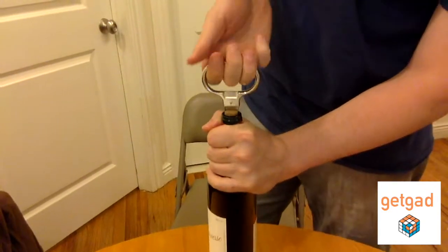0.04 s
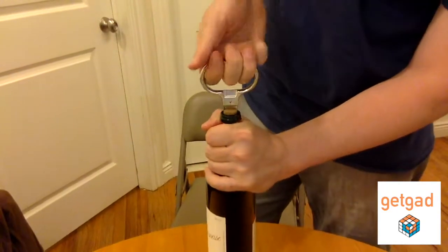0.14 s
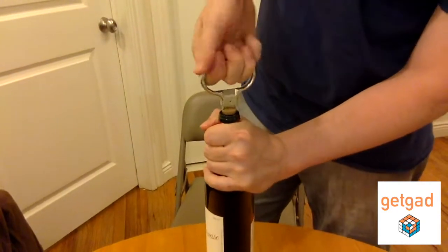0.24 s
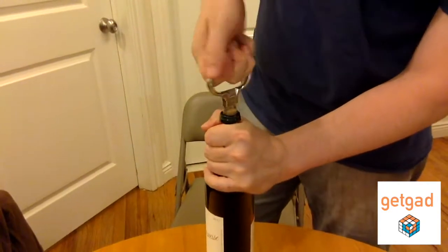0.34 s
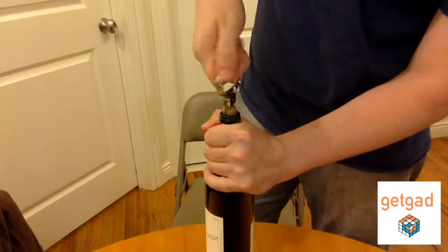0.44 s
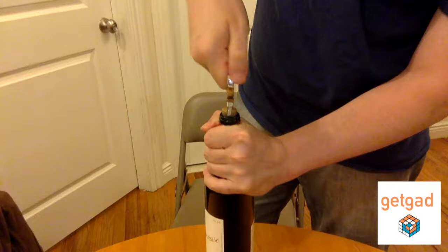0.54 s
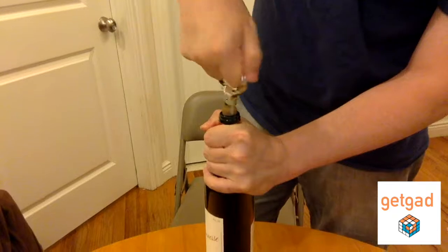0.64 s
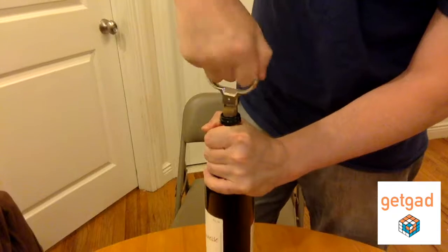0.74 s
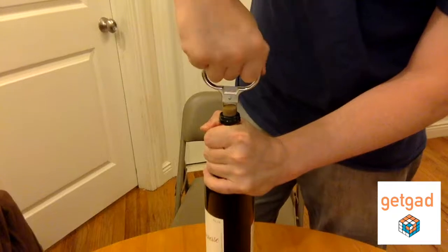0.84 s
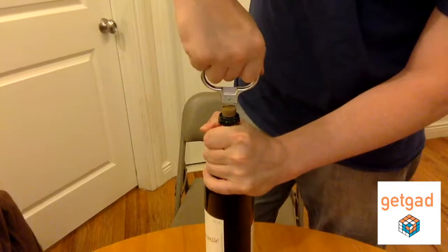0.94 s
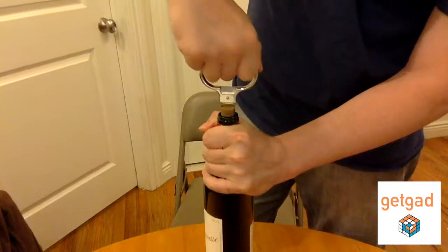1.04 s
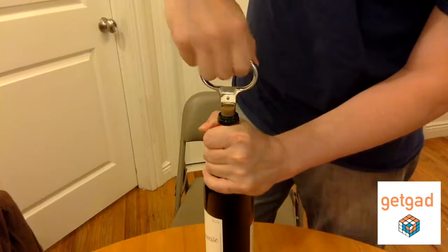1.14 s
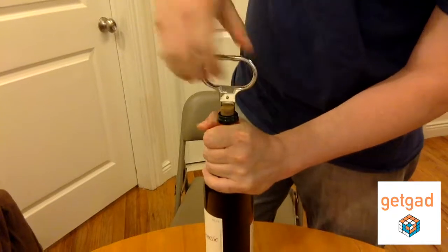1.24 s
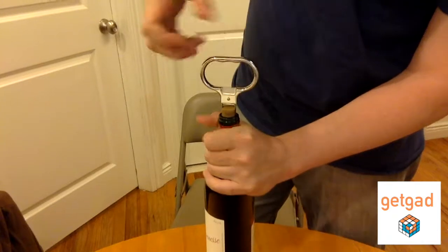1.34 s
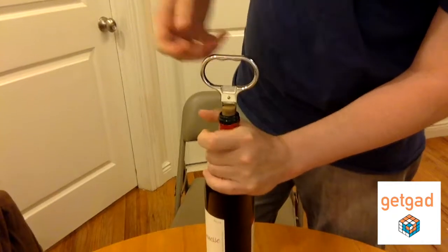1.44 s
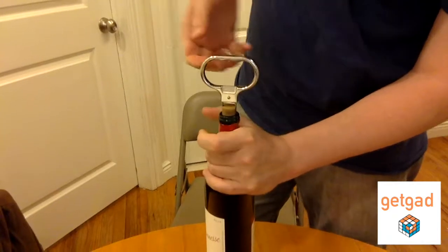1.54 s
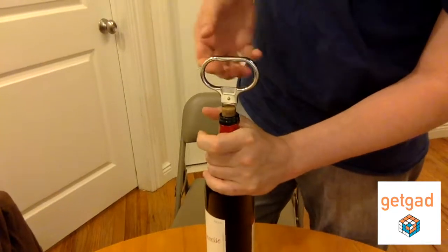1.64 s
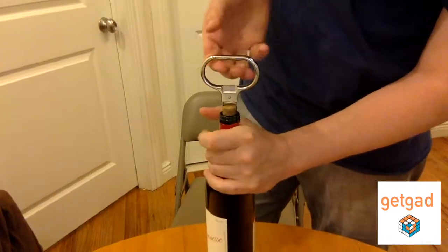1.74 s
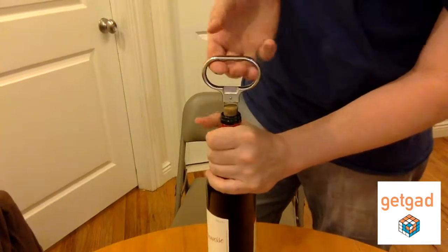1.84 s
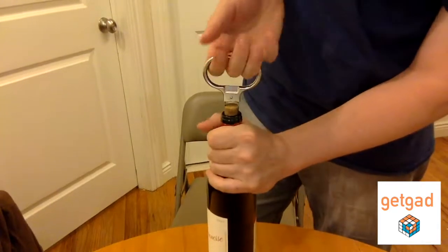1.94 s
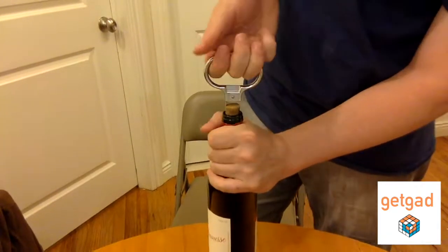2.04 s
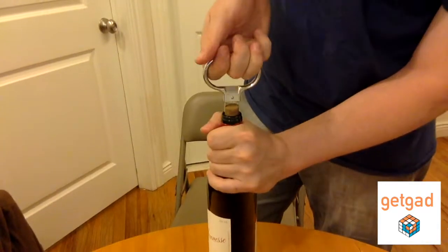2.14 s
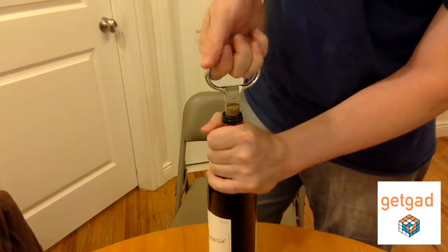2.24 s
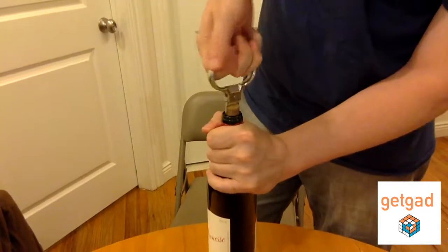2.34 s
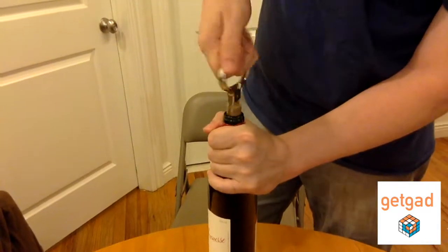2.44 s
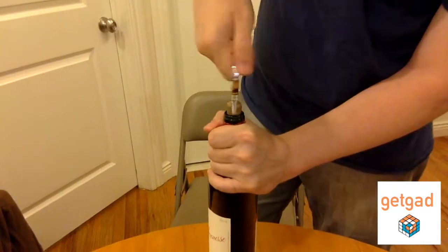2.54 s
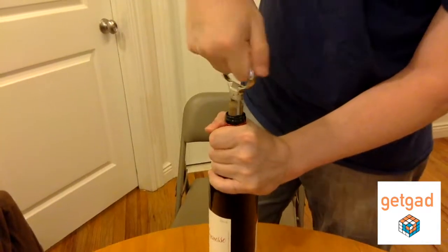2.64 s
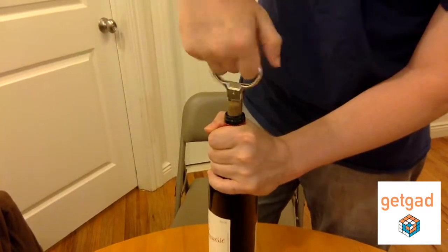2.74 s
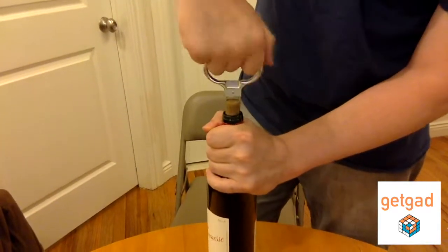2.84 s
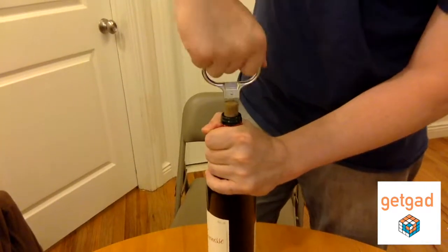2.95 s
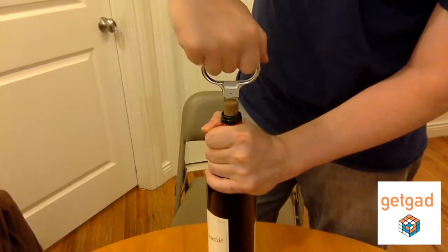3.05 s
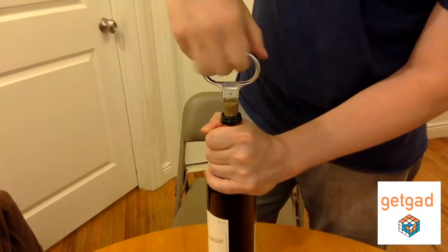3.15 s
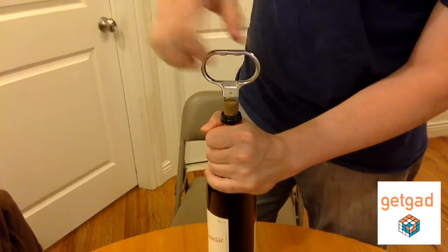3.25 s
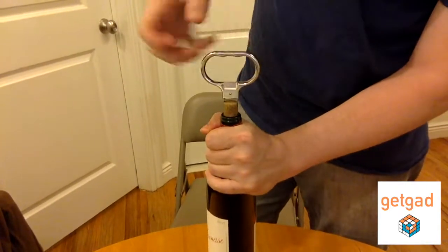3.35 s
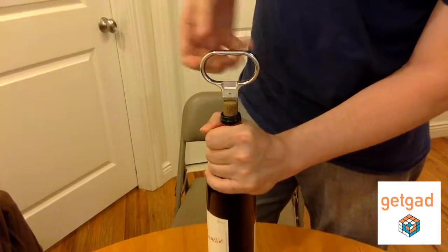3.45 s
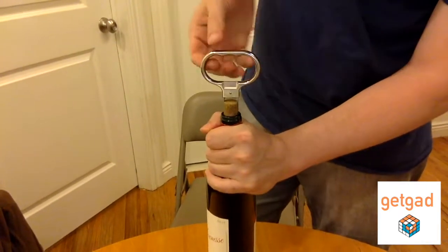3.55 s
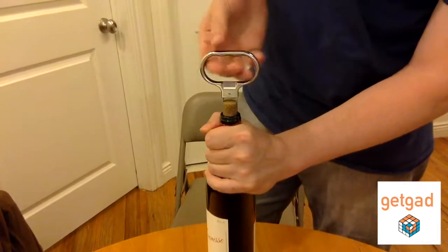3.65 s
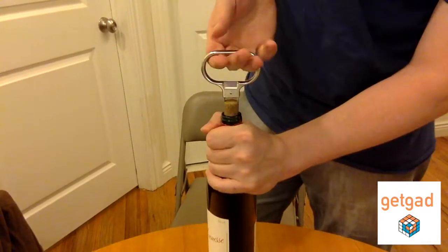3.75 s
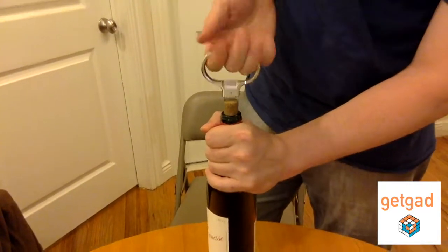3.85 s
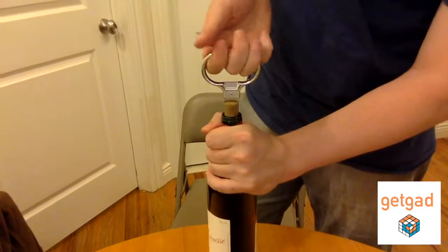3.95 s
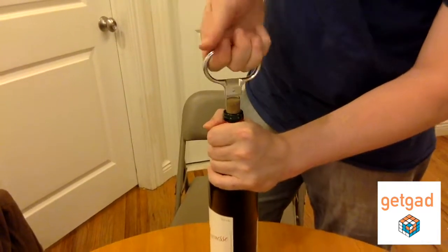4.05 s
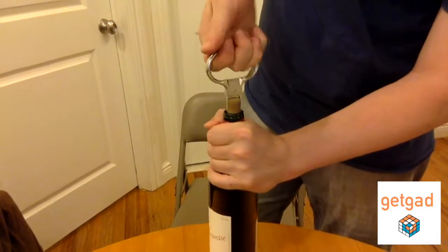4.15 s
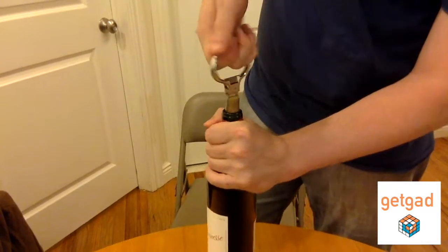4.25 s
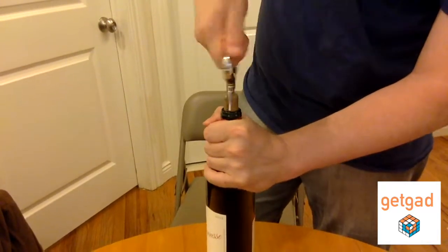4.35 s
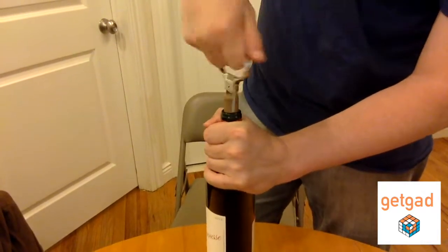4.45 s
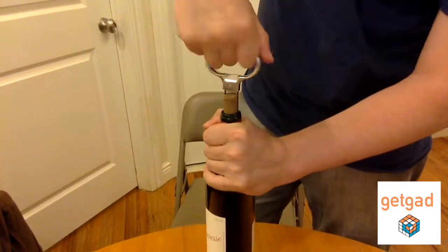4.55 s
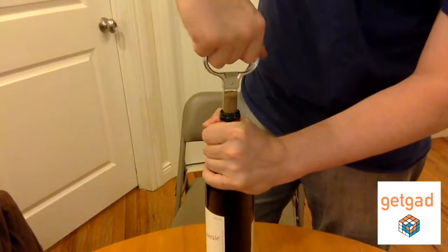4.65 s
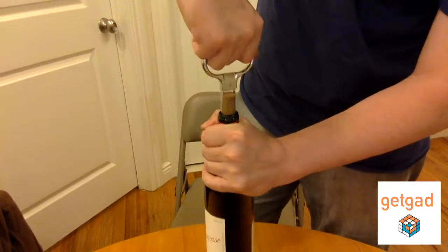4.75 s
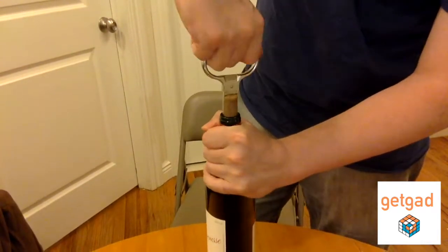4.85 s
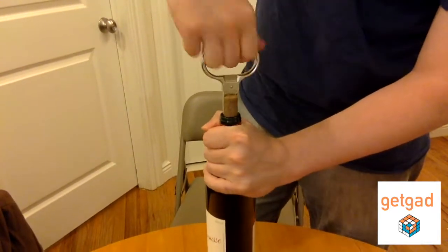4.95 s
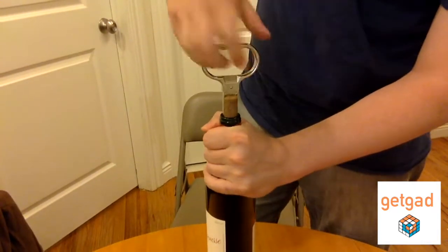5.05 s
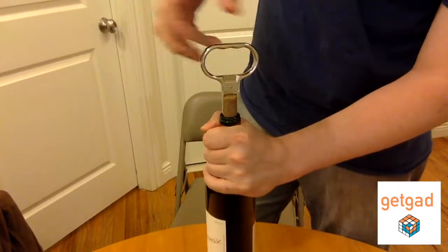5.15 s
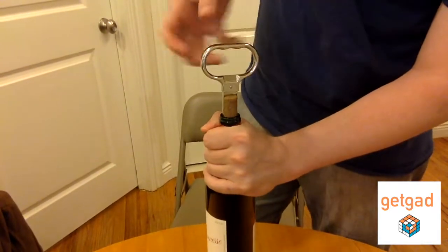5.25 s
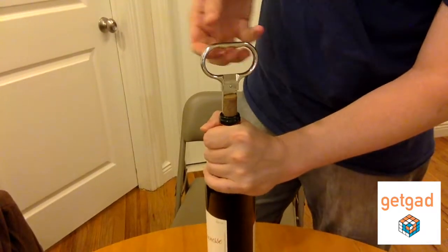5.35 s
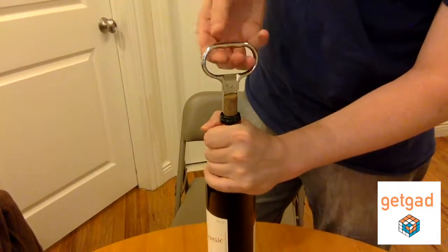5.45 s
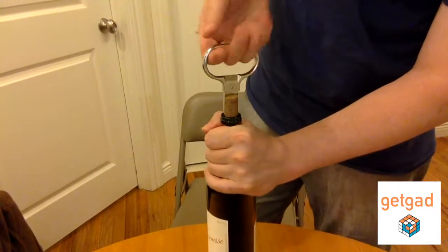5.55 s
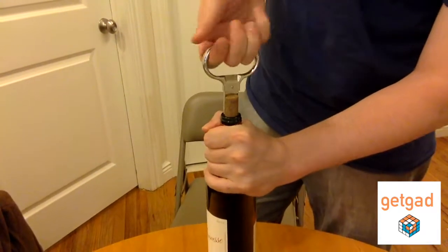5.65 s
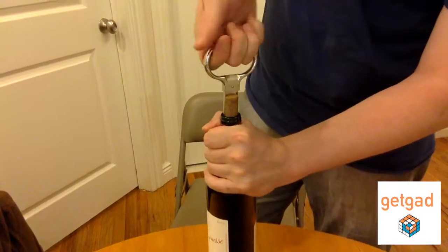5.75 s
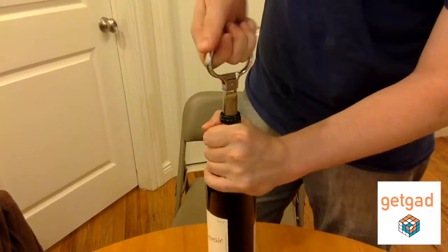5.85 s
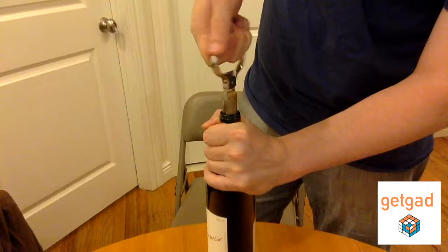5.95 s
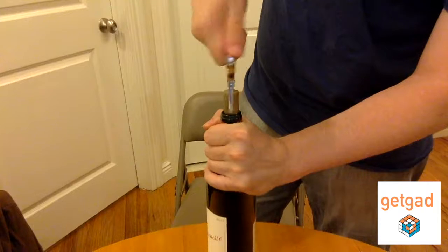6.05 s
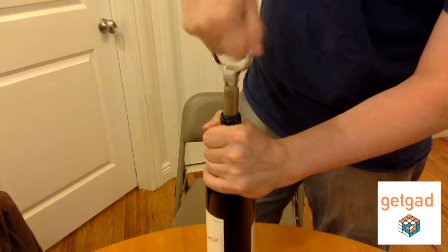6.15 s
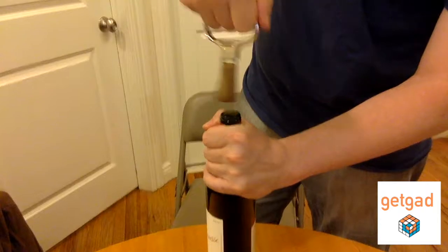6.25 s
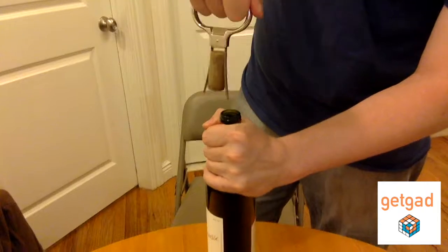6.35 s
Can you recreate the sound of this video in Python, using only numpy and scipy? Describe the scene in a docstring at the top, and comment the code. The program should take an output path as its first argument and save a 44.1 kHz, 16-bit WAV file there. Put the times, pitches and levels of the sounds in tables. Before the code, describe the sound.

A steel puller twists a cork out of a wine bottle in four short turns with pauses between them. Each turn is a run of dry, crackling creaks and squeaks against the glass, with a faint metallic ring. A hand bumps softly between turns. The last twist ends in a thump, a brief squeal and a sharp, ringing snap as the cork comes free. It sounds close, in a small room with a faint hum.

```python
"""In a small room with a low hum, a two-prong puller works a cork out of a wine bottle in four twists.
The cork moves by stick-slip friction on the glass: each slip cracks, chirps in the neck and excites
the modes of bottle and puller, and the slips crowd as the twist speeds up. The hand knocks softly.
At the end the bottle recoils, the slips merge into a squeal, and the steel prongs snap free and ring."""
import sys
import numpy as np
from scipy import signal
from scipy.fft import rfft, irfft
from scipy.io import wavfile
from scipy.ndimage import uniform_filter1d

SR = 44100
rng = np.random.default_rng(int(sys.argv[2]) if len(sys.argv) > 2 else 0)


def int16_out(signal):
    """Quantize to a 16-bit WAV file."""
    q = np.round(np.clip(np.atleast_2d(signal).T, -1, 1) * 32767)
    wavfile.write(sys.argv[1], SR, q.astype(np.int16))


N = 282681
TIME = np.arange(N) / SR


def from_db(db):
    """Amplitude ratio of a level in decibels."""
    return 10 ** (np.asarray(db) / 20)


def unit_rms(x):
    """Normalisation to unit mean power."""
    return x / np.sqrt(np.mean(x ** 2) + 1e-20)


def level_at(spectrum, hz):
    """Interpolation of a spectrum on a logarithmic frequency axis."""
    f, db = np.transpose(spectrum)
    return np.interp(np.log(np.maximum(hz, 1)), np.log(f), db)


def add(track, s, sound):
    """Superposition of a short sound on a track at time s."""
    i = int(round(s * SR))
    track[i:i + len(sound)] += sound[:N - i]


def convolve(x, response):
    """Output of a linear system with the given impulse response."""
    return signal.fftconvolve(x, response)[:N]


def coloured(x, spectrum, size=8192):
    """Minimum-phase filtering: folding the cepstrum makes the response causal."""
    gain = from_db(level_at(spectrum, np.fft.rfftfreq(size, 1 / SR)))
    cepstrum = irfft(np.log(gain))
    cepstrum[1:size // 2] *= 2
    cepstrum[size // 2 + 1:] = 0
    return convolve(x, irfft(np.exp(rfft(cepstrum))))


def resonate(force, modes):
    """Modal superposition: damped resonators of alternating sign, each level a gain at resonance."""
    out = np.zeros(N)
    for k, (hz, width, db) in enumerate(modes):
        r = np.exp(-np.pi * width / SR)
        poles = [1, -2 * r * np.cos(2 * np.pi * hz / SR), r * r]
        gain = (-1) ** k * from_db(db) * (1 - r * r) / 2
        out += gain * signal.lfilter([1, 0, -1], poles, force + 1e-18)
    return out


def burst(t60):
    """Exponentially decaying noise of unit energy."""
    t = np.arange(int(t60 * SR) + 2) / SR
    noise = rng.standard_normal(len(t)) * from_db(-60 * t / t60)
    return noise / np.linalg.norm(noise)


# spectral shape of the room noise: f/Hz, level/dB
AIR_SPECTRUM = [(15, -65), (25, -38.5), (41, -15), (64, 2.5), (120, -17.5), (236, -14), (270, -17),
                (317, -17), (659, -26), (796, -17), (1560, -18), (2690, -25), (6210, -33.5), (8140, -47),
                (16000, -41.5)]
# tones of the mains and a motor: f/Hz, rms level/dB
HUM_TONES = [(59.5, -78), (68.2, -80), (120, -81.5)]

def background(air_db=-68, whine_db=-95):
    """Stationary noise: broadband air, sinusoidal hum and a faint narrow-band whine."""
    air = unit_rms(coloured(rng.standard_normal(N), AIR_SPECTRUM))
    hum = sum(np.sqrt(2) * from_db(db) * np.sin(2 * np.pi * (hz * TIME + rng.random()))
              for hz, db in HUM_TONES)
    whine = unit_rms(resonate(rng.standard_normal(N), [(8800, 55, 0.0028), (8860, 37, 0.0033)]))
    return from_db(air_db) * air + hum + from_db(whine_db) * whine


# the hand changes its hold: t/s, relative level/dB
HAND_BUMPS = [(0.124, -44), (2.107, -48), (3.636, -48), (3.801, -42.5), (3.859, -42.5), (4.878, -29),
              (4.961, -38.5), (5.616, -44.5)]
# spectrum of palm against bottle: f/Hz, level/dB
BUMP_SPECTRUM = [(40, -31), (90, 10.5), (170, 1.5), (280, 10.5), (500, -3), (900, -7), (4000, -50.5),
                 (16000, -57)]

def hand(bump_db=20):
    """Soft impact: the yielding palm excites mainly low frequencies."""
    force = np.zeros(N)
    for s, db in HAND_BUMPS:
        add(force, s, from_db(db + bump_db) * burst(t60=0.16))
    return coloured(force, BUMP_SPECTRUM)


# turns of the hand: start t/s, fastest t/s, end t/s, slip rate/(1/s) and slip level/dB at full speed,
# creep level/dB at half speed (levels relative)
TWIST_STROKES = [(0.249, 0.66, 0.89, 79.2, -29, -41), (2.27, 2.661, 2.99, 92, -28, -33.5),
                 (4.15, 4.459, 4.755, 105, -24.5, -22.5), (5.918, 6.178, 6.225, 96, -30, -26)]

def twisting(start_speed=.25, end_speed=.7, stop_s=0.013):
    """Driving motion: each twist speeds up, eases and stops; gives speed (0-1), progress (0-1), index."""
    start, _, end = np.transpose(TWIST_STROKES)[:3]
    twist = np.searchsorted((end[:-1] + start[1:]) / 2, TIME)
    speed = sum(np.interp(TIME, [begin, peak, stop, stop + stop_s], [start_speed, 1, end_speed, 0], left=0)
                for begin, peak, stop, *_ in TWIST_STROKES)
    progress = np.clip((TIME - start[twist]) / (end - start)[twist], 0, 1)
    return speed, progress, twist


# sharp jerks of the cork after a longer stick: t/s, relative level/dB
CORK_JERKS = [(0.2138, -49.5), (0.259, -33.5), (0.2743, -28), (0.3025, -28), (0.3182, -27), (0.334, -27.5),
              (0.3462, -27), (0.3604, -29.5), (0.384, -22), (0.4146, -23), (0.4285, -27.5), (0.4487, -24),
              (0.4818, -22), (0.4953, -28), (0.5165, -23), (0.5302, -27.5), (0.5622, -21), (0.5992, -20.5),
              (0.6348, -24), (0.8208, -21), (0.9579, -23), (2.2166, -44.5), (2.2482, -47), (2.2844, -27.5),
              (2.3083, -24.5), (2.335, -23.5), (2.3625, -24.5), (2.3886, -20.5), (2.4143, -22),
              (2.4264, -21.5), (2.4467, -18.5), (2.5037, -19.5), (2.5583, -19), (2.6142, -23.5),
              (2.7838, -22.5), (2.8321, -19), (2.9428, -24.5), (4.1101, -47.5), (4.151, -20.5),
              (4.1841, -19.5), (4.1981, -21), (4.2113, -19), (4.2426, -17.5), (4.3258, -16), (4.36, -17.5),
              (4.373, -19), (4.4464, -16.5), (4.4716, -15.5), (4.487, -20.5), (4.5387, -19), (4.7473, -20),
              (5.9281, -18), (5.9622, -18), (5.9778, -19), (6.0031, -20), (6.0245, -20.5), (6.0433, -20),
              (6.0549, -23.5), (6.1022, -19.5)]
STICK_S = .009   # time the cork holds fast next to a jerk

def slips(speed, jerk_db=-5.0, count=70, gap_jitter=.33, db_per_speed=5, spread_db=2,
          afterslip_s=.0045, afterslip_db=-2.5, afterslip_chance=.5):
    """Relaxation oscillation: between jerks, one slip per step of travel; gives rows of t/s, strength."""
    jerk_s, jerk_level_db = np.transpose(CORK_JERKS)
    rows = [np.c_[jerk_s, from_db(jerk_level_db + jerk_db)]]
    for start, _, end, per_s, db, _ in TWIST_STROKES:
        i = np.arange(int(start * SR), int(end * SR))
        travel = np.cumsum(per_s * speed[i]) / SR
        gap, size = rng.uniform(-1, 1, (2, count))
        due = np.cumsum(1 + gap_jitter * gap)
        s = np.interp(due, travel, i / SR)
        pace = speed[(s * SR).astype(int)]
        nearest_jerk_s = np.abs(s[:, None] - jerk_s).min(axis=1)
        free = (due < travel[-1]) & (nearest_jerk_s * pace > STICK_S)   # sticks longer when slow
        rows.append(np.c_[s, free * from_db(db + db_per_speed * (pace - 1) + spread_db * size)])
    s, strength = np.vstack(rows).T
    # a slip may catch and go again, more often at speed
    luck, delay = rng.random((len(s), 2)).T
    again = luck < afterslip_chance * speed[(s * SR).astype(int)]
    afterslips = np.c_[s + afterslip_s * (delay + .5), strength * again * from_db(afterslip_db)]
    return np.r_[np.c_[s, strength], afterslips]


def release(length_s, crumble_db, crumble_t60):
    """Sudden unloading: a half-sine pulse of noise and a brief crumble of the contact."""
    crumble = from_db(crumble_db) * burst(crumble_t60)
    window = np.sin(np.pi * np.minimum(np.arange(len(crumble)) / (length_s * SR), 1))
    pulse = rng.standard_normal(len(crumble)) * window
    return crumble + pulse / np.linalg.norm(pulse)


def chirp(hz, t60=0.0067, rise_s=0.00043, bend=0.21, bend_s=0.00051):
    """Damped friction oscillation: the cork skids, falling in pitch until it grips again."""
    t = np.arange(SR // 40) / SR
    phase = 2 * np.pi * np.cumsum(hz * (1 + bend * np.exp(-t / bend_s))) / SR
    return np.sin(phase) * (1 - np.exp(-t / rise_s)) * from_db(-60 * t / t60)


# spectrum of one slip's dry crack: f/Hz, level/dB
CRACK_SPECTRUM = [(50, -33), (150, -18.5), (430, 0.5), (660, -17.5), (850, -1), (1250, -3), (1800, -10.5),
                  (2200, -0.5), (3800, 0.5), (6700, -3.5), (7500, -13.5), (10700, -16), (13000, -22),
                  (16000, -24)]

def crack(force, treble_db, shelf_hz=8000):
    """Impulsive excitation: a brief force gives a broad spectrum, here with a treble shelf."""
    bright = coloured(force, CRACK_SPECTRUM)
    dull = signal.sosfilt(signal.butter(1, shelf_hz, fs=SR, output="sos"), bright)
    return dull + (bright - dull) * from_db(treble_db)


# modes of the puller's steel handle: f/Hz, bandwidth/Hz, level/dB
STEEL_MODES = [(1231, 3.4, 6), (1283, 2.4, 17.5), (2992, 6.5, 9.5), (4341, 8, 6)]

def steel_ring(jolts):
    """Energy storage: lightly damped modes gather many jolts and decay slowly."""
    out = np.zeros(N)
    for hz, width, db in STEEL_MODES:
        retained = np.exp(-2 * np.pi * width / SR)
        energy = signal.lfilter([1], [1, -retained], jolts ** 2 + 1e-18)
        amplitude = from_db(db) * (1 - retained) * np.sqrt(energy)
        out += amplitude * np.sin(2 * np.pi * (hz * TIME + rng.random()))
    return out


# the cork's contact in each twist, more damped and squeakier as it rises: relative level/dB of thump,
# glass, steel, crack, treble and skid; first and last skid f/Hz; first and last scatter/(1.5 octaves)
CORK_CONTACT = [(0, 1.5, 4, -.5, -2, -7, 2160, 2400, 0.16, 0.423),
                (-4, -1, -1, -.5, -5, 2, 3800, 2530, 0.51, 0.33),
                (-3.5, -6, -1, -4, -4, 7, 4350, 4780, .17, .19),
                (-2.5, -6.5, -6, -5, -6, 9.5, 4340, 3500, 0.036, 0.27)]
# modes of the held bottle rocking on the table: f/Hz, bandwidth/Hz, level/dB
ROCKING_MODES = [(90.5, 9.5, 8.5), (190, 83, -3.5), (246.4, 11, 15), (270.8, 11, 16.5), (322.9, 11, 16.5),
                 (358, 33, -2), (420, 16, -8), (495.4, 21, -1.5)]
# modes of the bottle with the puller wedged in it: f/Hz, bandwidth/Hz, level/dB
GLASS_MODES = [(763.3, 24, 7.5), (826, 31, 5.5), (876, 50, 0), (1002, 38, 7), (1011, 17, -3),
               (1172.5, 23, 1.5), (2295, 40, 0), (2417, 12, -0.5), (2537, 10, -1), (3030, 12, 6.5),
               (4300, 22, -1), (6676, 97, -9.5), (8190, 62, -9.5), (8700, 150, -16.5)]
# the cork's squeak in the neck and the glass modes it rings: f/Hz, bandwidth/Hz, level/dB
NECK_MODES = [(4270, 150, 0), (2664, 16, 6), (4267, 20, 2), (4664, 20, 4), (4341, 24, 4), (5228, 16, 8),
              (4420, 16, 9)]

def cork(force_db=23.0, body_db=3.77, chirp_db=3.0, thump_db_per_speed=5, skid_db_per_speed=10.5,
         grip_db=7.5):
    """Stick-slip friction: each release cracks, chirps and drives the modes; gives creak, steel ring."""
    speed, progress, twist = twisting()
    contact = np.array(CORK_CONTACT)[twist].T
    thump_db, glass_db, steel_db, crack_db, treble_db, skid_db = contact[:6]
    first_hz, last_hz, first_scatter, last_scatter = contact[6:]
    thump_db = thump_db + thump_db_per_speed * (speed - 1)
    skid_db = skid_db + skid_db_per_speed * (speed - 1)
    steel_db = steel_db - grip_db * (1 - progress)   # the hand mutes the steel, then loosens
    skid_hz = first_hz + (last_hz - first_hz) * progress
    scatter = first_scatter + (last_scatter - first_scatter) * progress
    jolts, grit, chirps = np.zeros((3, N))
    for s, strength in slips(speed):
        i = int(s * SR)
        hz = skid_hz[i] * 2 ** (scatter[i] * rng.uniform(-1.5, 1.5))
        let_go = release(length_s=.0017, crumble_db=-2.5, crumble_t60=.02)
        add(jolts, s, strength * from_db([force_db + body_db]))
        add(grit, s, strength * from_db(force_db) * let_go)
        add(chirps, s, strength * from_db(chirp_db) * chirp(hz))
    microslips = creep(speed, twist)
    jolts += microslips
    chirps *= from_db(skid_db)
    cracks = crack((grit + microslips) * from_db(crack_db), treble_db)
    squeaks = chirps + resonate(chirps, NECK_MODES)
    thumps = resonate(jolts * from_db(thump_db), ROCKING_MODES)
    glass = resonate(jolts * from_db(glass_db), GLASS_MODES)
    return cracks + squeaks + thumps + glass, steel_ring(jolts * from_db(steel_db))


# the cork gives way in a short rush of tiny slips: t/s, relative level/dB
CREEP_RUSHES = [(0.836, -19.5), (2.66, -23), (2.85, -15), (4.679, -17.5), (6.11, -16), (6.21, -26)]

def creep(speed, twist, per_s=340, gain_db=6.5, spread_db=5.0, db_per_speed=17.5, stuck_db=-6,
          rise_s=0.014, fall_s=.05):
    """Microslip: random impulses that grow with speed, surge in each rush and weaken before a jerk."""
    twist_db = np.array(TWIST_STROKES)[twist, -1]
    steady = (speed > 0) * from_db(twist_db + db_per_speed * (speed - 0.5))
    surges = sum(from_db(db) * np.exp(-((TIME - s) / np.where(TIME < s, rise_s, fall_s)) ** 2)
                 for s, db in CREEP_RUSHES)
    jerk_s = np.append(np.array(CORK_JERKS)[:, 0], np.inf)
    stuck = jerk_s[np.searchsorted(jerk_s, TIME)] - TIME < STICK_S
    impulses = rng.random(N) < per_s / SR
    size_db = gain_db + spread_db * rng.uniform(-0.42, 1.09, N)
    return impulses * (steady + surges) * from_db(size_db + stuck_db * stuck)


# the bottle kicks against the table as the cork lets go: t/s, level/dB
RECOIL_KICKS = [(6.165, 8.5), (6.185, 7), (6.292, -3.5)]

def recoil():
    """Impulse response: the pull slackens at once and the bottle thumps in its rocking modes."""
    jolts = np.zeros(N)
    for s, db in RECOIL_KICKS:
        add(jolts, s, from_db([db]))
    return resonate(jolts, ROCKING_MODES)


# the cork's last edge sliding through the mouth: t/s, f/Hz, relative level/dB, roughness (0-1)
SQUEAL_PATH = [(6.188, 1900, -60, .8), (6.197, 1700, -33, .8), (6.206, 1340, -34, .6),
               (6.215, 1330, -31, .6), (6.226, 1400, -35, .6), (6.234, 2660, -28, .3),
               (6.244, 2690, -31, .2), (6.256, 2720, -41, .25), (6.278, 2710, -44, .25),
               (6.29, 2700, -70, .3)]
# spectral envelope of its harmonics: f/Hz, level/dB
SQUEAL_SPECTRUM = [(1300, -10.5), (1900, -13), (2700, -6), (4000, -3), (5400, -2.5), (6700, -14),
                   (8000, -51), (16000, -34.5)]

def squeal(jitter=.12, flutter_db=4, harmonics=7):
    """Self-excited oscillation: slips merge into a rough tone that jumps an octave as the cork leaves."""
    s, *columns = np.transpose(SQUEAL_PATH)
    hz, db, rough = [np.interp(TIME, s, column) for column in columns]
    wobble, flutter = [unit_rms(uniform_filter1d(w, size=60)) for w in rng.standard_normal((2, N))]
    phase = 2 * np.pi * np.cumsum(hz * (1 + jitter * rough * wobble)) / SR
    tone = sum(from_db(level_at(SQUEAL_SPECTRUM, k * hz)) * np.sin(k * phase)
               for k in range(1, harmonics + 1))
    sliding = (TIME > s[0]) & (TIME < s[-1])
    return tone * from_db(db + flutter_db * rough * flutter) * sliding


# the prongs snap free of the neck: t/s, relative level/dB
PRONG_SNAPS = [(6.292, -3), (6.295, -13), (6.2955, -12)]
# spectrum of a snap: f/Hz, level/dB
SNAP_SPECTRUM = [(100, 4), (700, -1.5), (2000, -3), (3900, 3), (5000, 3.5), (8300, -4), (12000, -4),
                 (16000, -9)]

def prongs(snap_db=-5, ring_db=6.5):
    """Free vibration: sprung steel flicks off the lip, and steel and glass ring on."""
    force, flick = np.zeros((2, N))
    for s, db in PRONG_SNAPS:
        let_go = release(length_s=0.00146, crumble_db=-3, crumble_t60=0.009)
        add(force, s, from_db(db + snap_db) * let_go)
    add(flick, PRONG_SNAPS[0][0], from_db([ring_db]))
    return coloured(force, SNAP_SPECTRUM) + steel_ring(flick) + resonate(force, GLASS_MODES)


# reverberation time of the room: f/Hz, T60/s
REVERB_TIMES = [(100, 0.78), (300, 0.3), (800, 0.31), (2500, 0.42), (5000, 0.35), (8000, 0.34),
                (16000, 0.16)]

def room(x, table_s=.0017, table_db=-11, wet_db=-4, build_s=0.005, low_cut_hz=420):
    """Reverberation: direct sound, a table-top reflection and a diffuse tail whose top dies first."""
    t = np.arange(SR * 3 // 4) / SR
    freqs = np.fft.rfftfreq(len(t), 1 / SR)
    white = rfft(rng.standard_normal(len(t)))
    centres, t60s = np.transpose(REVERB_TIMES)
    tail = np.zeros(len(t))
    for share, t60 in zip(np.eye(len(centres)), t60s):
        band = np.interp(freqs, centres, share)
        tail += irfft(white * band, len(t)) * from_db(-60 * t / t60)
    tail *= 1 - np.exp(-t / build_s)
    echoes = from_db(wet_db) * tail / np.linalg.norm(tail)
    echoes[int(table_s * SR)] += from_db(table_db)
    low_cut = signal.butter(2, low_cut_hz, "high", fs=SR, output="sos")
    return x + convolve(x, signal.sosfilt(low_cut, echoes))


def scene():
    """Superposition: creak and knocks reverberate; the steel ring of the slips is heard directly."""
    creak, ring = cork()
    sources = creak + squeal() + prongs() + recoil() + hand()
    return (room(sources) + ring + background())[None]


def record(dry, cutoff_hz=16100):
    """Band limiting: a steep elliptic low-pass cuts the highest treble."""
    return signal.sosfilt(signal.ellip(10, .2, 70, cutoff_hz, fs=SR, output="sos"), dry)


dry = scene()
out = record(dry)
int16_out(out)
```